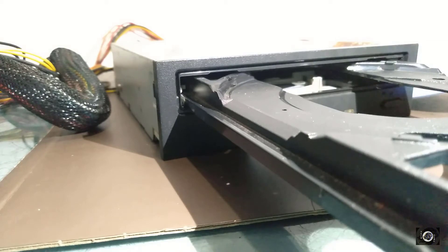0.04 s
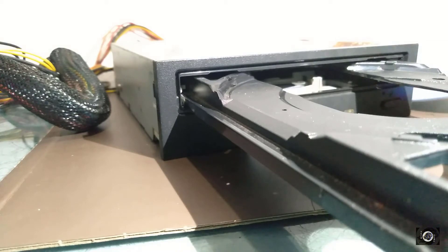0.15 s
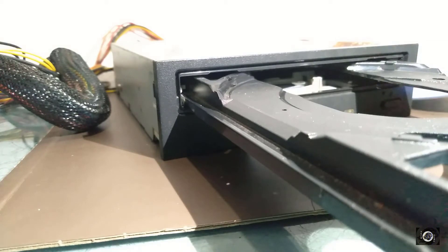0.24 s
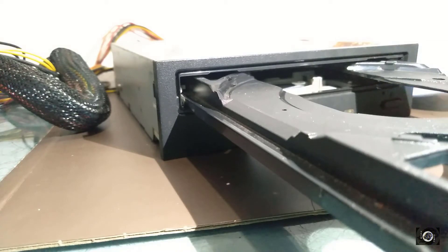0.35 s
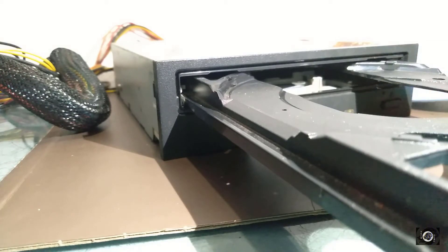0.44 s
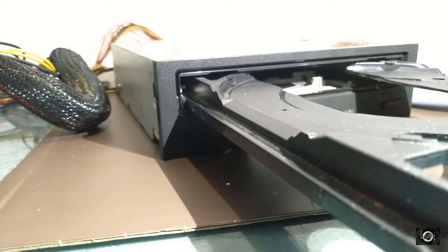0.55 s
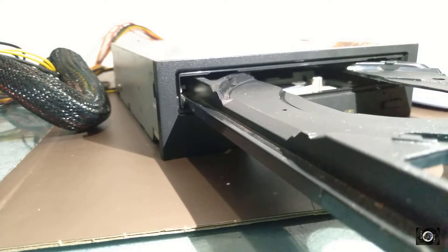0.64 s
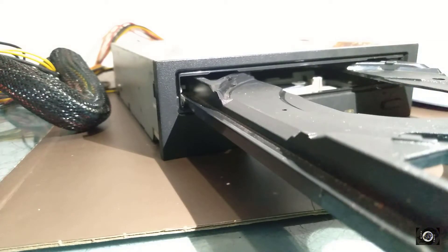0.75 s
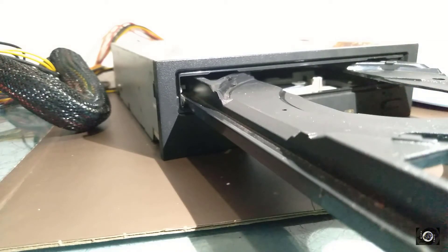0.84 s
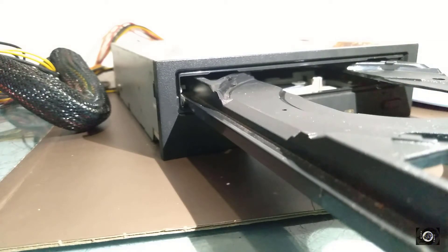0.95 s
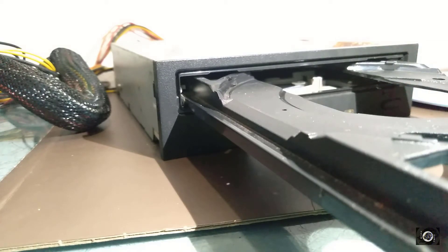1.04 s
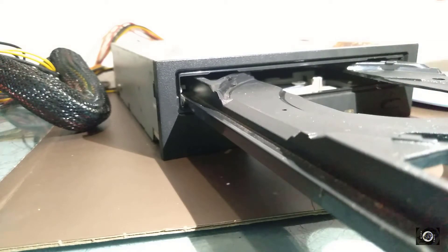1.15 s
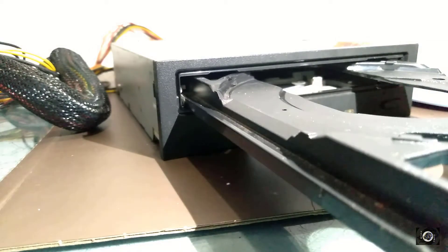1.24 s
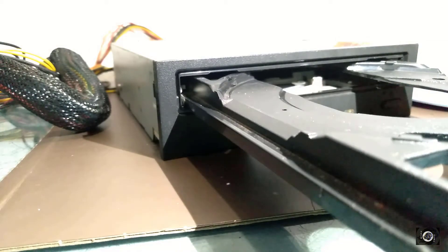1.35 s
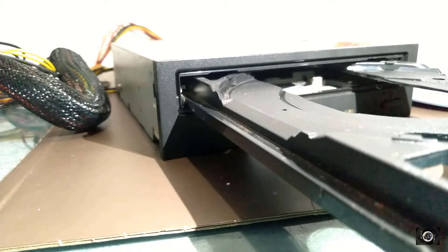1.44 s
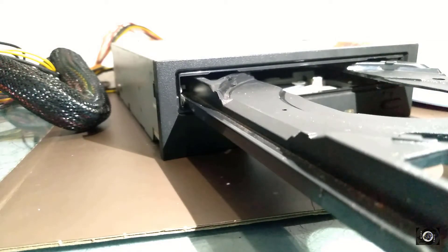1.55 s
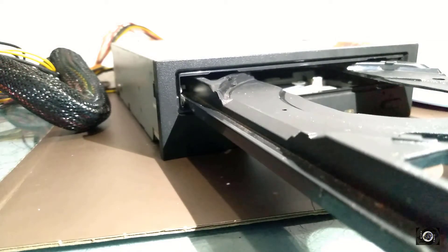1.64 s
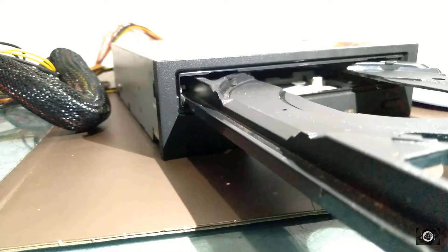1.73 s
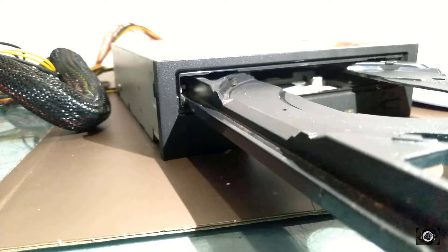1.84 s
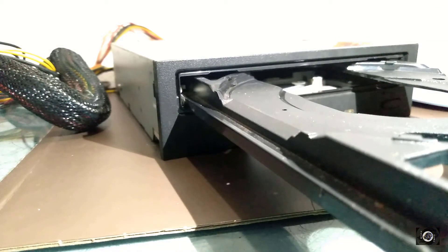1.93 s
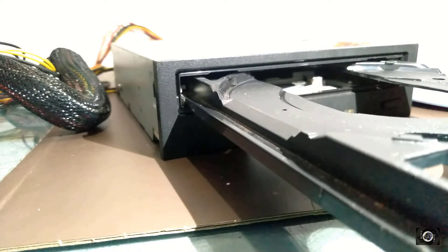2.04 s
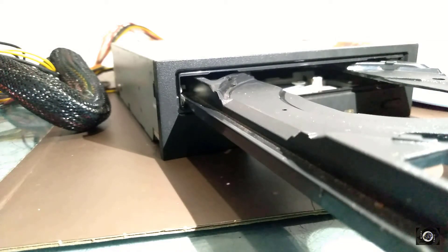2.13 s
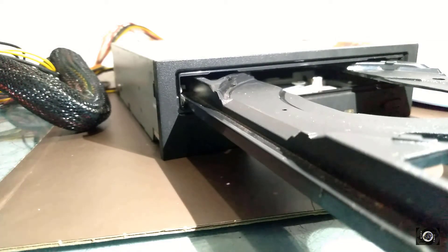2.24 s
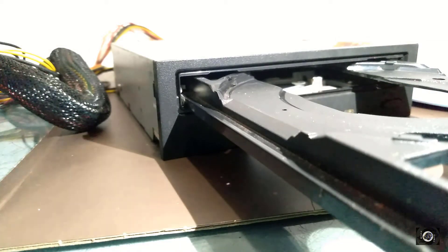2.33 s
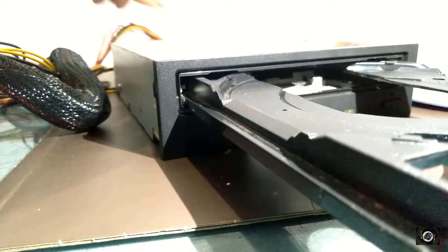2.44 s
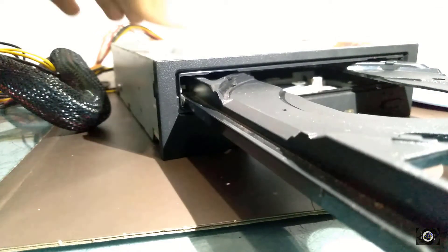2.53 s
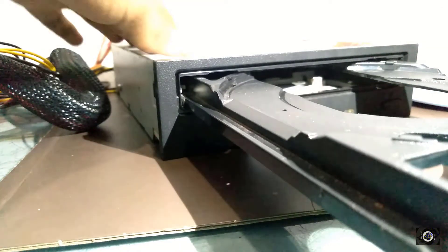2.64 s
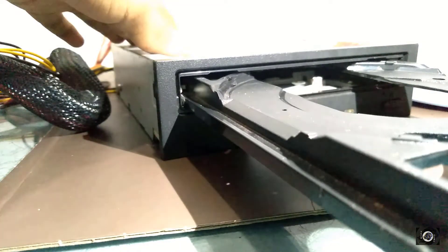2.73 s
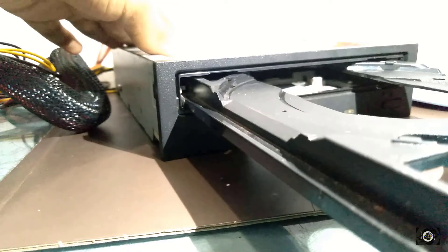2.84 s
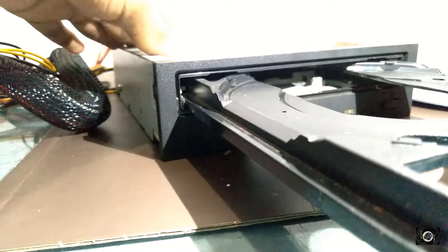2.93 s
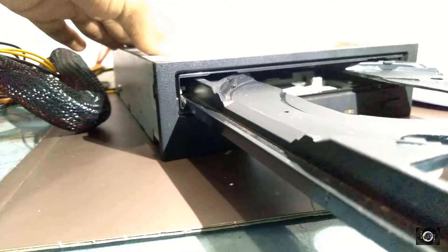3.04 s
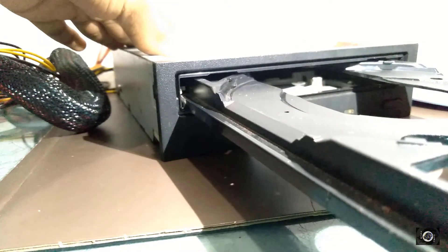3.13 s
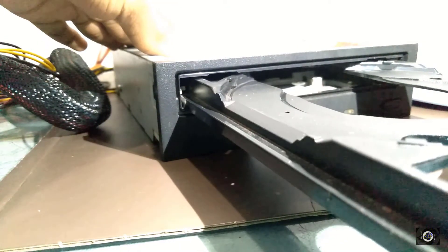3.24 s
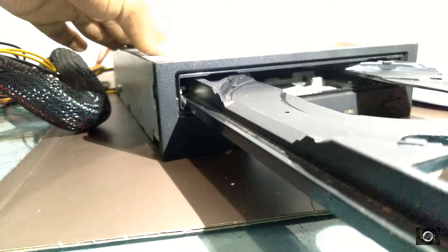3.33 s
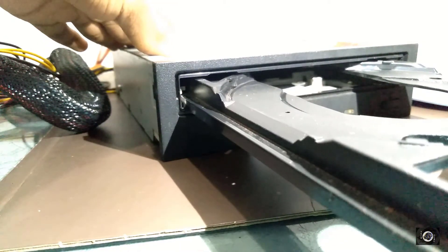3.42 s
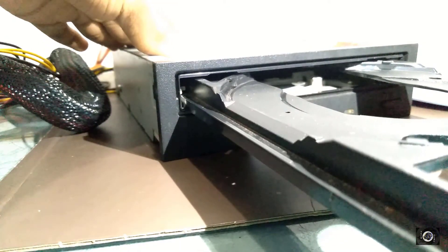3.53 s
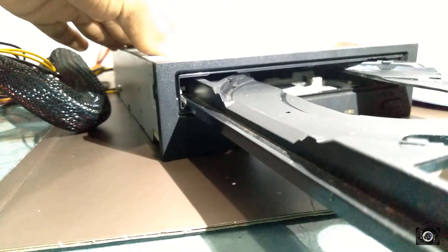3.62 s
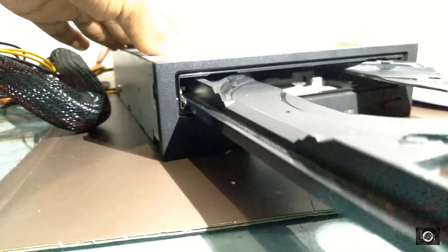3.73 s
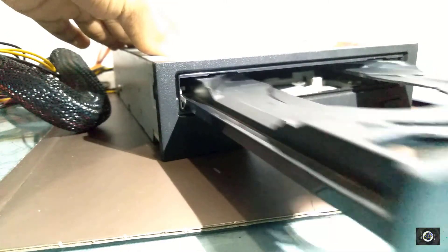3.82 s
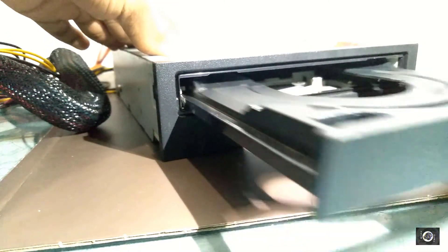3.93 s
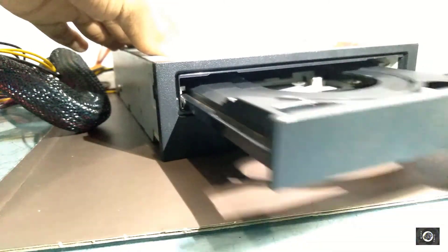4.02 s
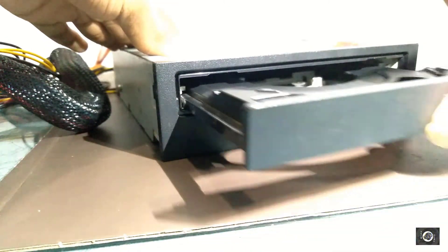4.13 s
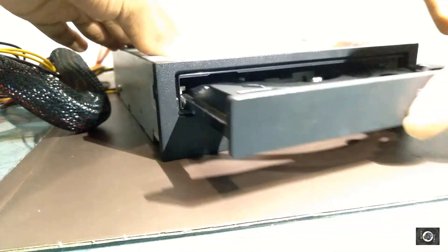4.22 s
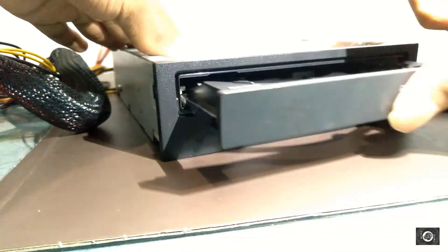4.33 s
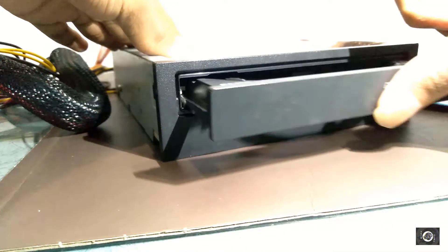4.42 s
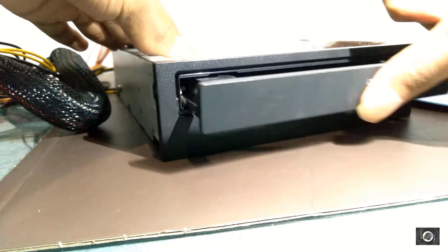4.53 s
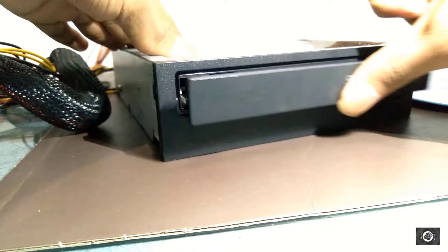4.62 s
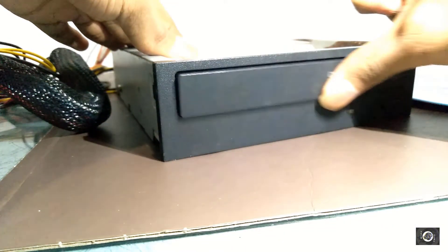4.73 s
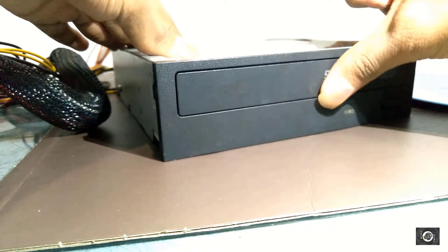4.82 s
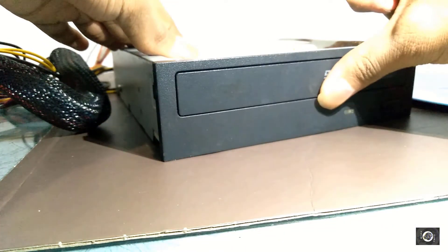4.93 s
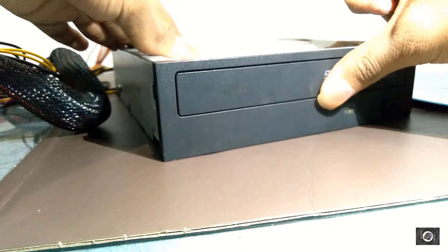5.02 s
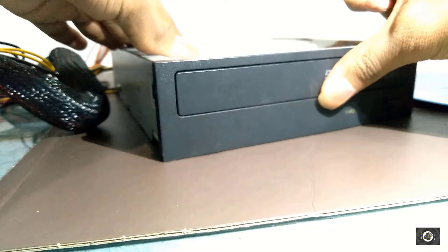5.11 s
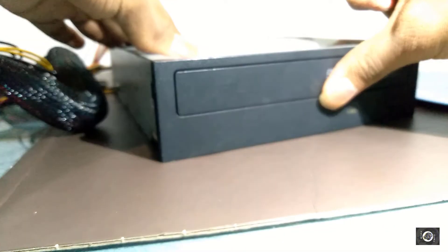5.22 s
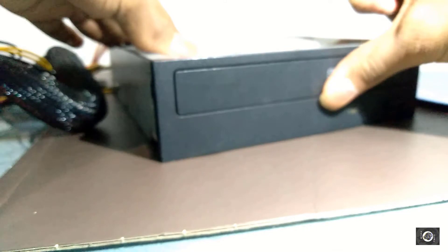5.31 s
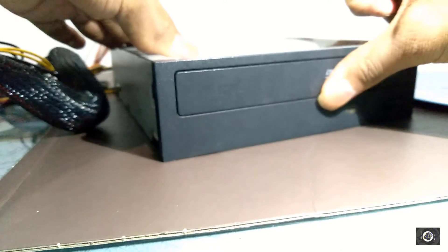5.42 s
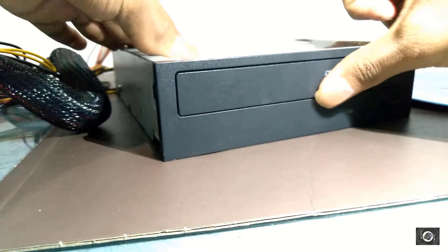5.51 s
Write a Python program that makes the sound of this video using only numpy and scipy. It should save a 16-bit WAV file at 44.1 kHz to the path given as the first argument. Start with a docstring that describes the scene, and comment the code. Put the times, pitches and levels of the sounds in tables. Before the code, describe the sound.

Close-up handling of a drive tray: sharp clicks, a rattling cluster, hissy scraping, then the rack whirs in and clacks closed.

```python
"""The open plastic tray of a disc drive is pushed shut on a table, close to the microphone: the rack
spins the gears into a hum and the runners rub as filtered friction noise. Before that the tray clicks,
rattles, scrapes and creaks: impulsive chatter and noise excite its resonances. The mechanism clacks
home, soft thumps travel through the table, and one last small click rings the front panel.
Low room noise and a thin whine lie beneath."""
import sys
import numpy as np
from scipy import signal
from scipy.fft import rfft, irfft
from scipy.io import wavfile
from scipy.ndimage import uniform_filter1d

SR = 44100
rng = np.random.default_rng(int(sys.argv[2]) if len(sys.argv) > 2 else 0)


def store_pcm(level_fs):
    """Save levels as 16-bit WAV."""
    pcm = np.round(np.clip(level_fs, -1, 1) * 32767).astype(np.int16)
    wavfile.write(sys.argv[1], SR, np.atleast_2d(pcm).T)


N = 245328
TIME = np.arange(N) / SR  # s
GRID = np.fft.rfftfreq(4096, 1 / SR)  # frequencies of every colour curve, Hz
PUSH_S, HOME_S = 3.79, 4.845  # the tray starts to move, and arrives
# low boom of the table and rumble of the moving tray: hz, level_db
RUMBLE_COLOUR = [(30, -26), (55, -9.5), (80, -2), (130, 1.5), (240, 2), (330, -6), (420, -19.5),
                 (700, -38.5)]


def amp(db):
    """Level in decibels to amplitude ratio."""
    return 10 ** (np.asarray(db) / 20)


def evened(x):
    """Normalization to an rms of 1."""
    return x / np.sqrt(np.mean(x ** 2) + 1e-20)


def shape(points):
    """Spectral envelope: points in dB joined on a log-frequency axis."""
    hz, db = np.transpose(points)
    return np.interp(np.log(GRID + 1), np.log(hz), db)


def peaks(modes):
    """Resonance curves: each mode is a bump, or a hollow, in dB around its frequency."""
    return sum(db / (1 + (2 * (GRID - hz) / width) ** 2) for hz, width, db in modes)


def ripple(count=45):
    """Modal density: a contact point favours some close modes, a random curve of rms 1 over frequency."""
    waves = rng.standard_normal(2 * count) + 1j * rng.standard_normal(2 * count)
    return evened(irfft(np.r_[0, waves], len(GRID)))


def colour(x, db):
    """Minimum-phase filter of unit energy: resonances ring after the blow, never before."""
    log_gain = np.log(amp(np.r_[db, db[-2:0:-1]]))
    spectrum = np.exp(np.conj(signal.hilbert(log_gain)))
    response = np.fft.ifft(spectrum).real
    return signal.oaconvolve(x, response / np.linalg.norm(response))[:len(x)]


def wander(rate_hz):
    """Low-passed noise: a smooth random motion of rms 1."""
    low_pass = 1 + (np.fft.rfftfreq(N, 1 / SR) / rate_hz) ** 4
    return evened(irfft(rfft(rng.standard_normal(N)) / low_pass, N))


def fuzzy_tone(hz, width_hz):
    """Quadrature modulation: two slow noises turn a carrier into a narrow noise band that follows hz."""
    turn = 2 * np.pi * np.cumsum(hz * np.ones(N)) / SR
    return evened(wander(width_hz / 2) * np.cos(turn) + wander(width_hz / 2) * np.sin(turn))


def friction(grain, flutter):
    """Dry friction: countless micro-slips of uneven size, coming in faint clumps."""
    return evened(rng.standard_normal(N) * (1 + grain * wander(900)) * (1 + flutter * wander(49)))


def drift(x, patch_db, size=(14, 4)):
    """Moving contact: different resonances come and go, as smoothed random gains over time and frequency."""
    z = signal.stft(x, nperseg=1024, noverlap=768)[2]
    patches = uniform_filter1d(rng.standard_normal(z.shape), size[0], 1)  # along time
    patches = evened(uniform_filter1d(patches, size[1], 0))  # along frequency
    return evened(signal.istft(z * amp(patch_db * patches), nperseg=1024, noverlap=768)[1][:N])


def cavity(x, open_delay=0.0018, shut_delay=0.00095, echo=0.087,
           long_open_delay=0.0037, long_shut_delay=.0032, long_echo=0.13):
    """Comb filtering: two case reflections shorten as the tray goes in, so hollows drift (delays in s)."""
    travel = [PUSH_S, HOME_S]
    near = np.interp(TIME - np.interp(TIME, travel, [open_delay, shut_delay]), TIME, x)
    far = np.interp(TIME - np.interp(TIME, travel, [long_open_delay, long_shut_delay]), TIME, x)
    return evened(x - echo * near + long_echo * far)


def add(mix, s, sound):
    """Superposition: adds a sound to the mix from time s, in place."""
    part = mix[round(s * SR):][:len(sound)]
    part += sound[:len(part)]


def next_drop(s):
    """Truncated decay: the time left until a sound begun at s falls away, and how far it falls."""
    # a lingering sound falls away abruptly: start_s, drop_db
    falls = [(0.382, -7), (0.887, -14), (1.906, -12.5), (3.092, -13), (3.491, -9.5), (4.989, -13.5)]
    return next(((at - s, db) for at, db in falls if at > s), (1, 0))


def background():
    """Stationary noise: a low room floor and a thin electronic whine of narrow noise bands."""
    # room noise: hz, level_db
    floor_colour = [(25, -20), (45, -11.5), (80, 2), (130, -3), (200, -18.5), (450, -17.5), (1000, -20),
                    (2500, -26.5), (5000, -29), (8500, -26.5), (13000, -32.5)]
    # thin electronic whine: hz, width_hz, level_db
    whine_bands = [(14100, 12, -69.5), (15150, 110, -67.5)]
    floor_db = -67.5
    whine = sum(amp(db) * fuzzy_tone(hz, width) for hz, width, db in whine_bands)
    return amp(floor_db) * colour(rng.standard_normal(N), shape(floor_colour)) + whine


def creaks(width_hz=83, width_share=0.081):
    """Stick-slip: the plastic moans under the fingers on gliding resonances; high ones are scratchier."""
    # creaks: loudest_s, pitch_hz, glide_hz_per_s, level_db, length_s
    moans = [(0.261, 5260, 2, -54, .025), (0.314, 600, 1, -42, 0.012), (0.534, 643, -42, -58.5, 0.14),
             (1.485, 433, -85, -61.5, 0.063), (1.685, 325, 499, -36, 0.024), (1.695, 2395, -3, -45, 0.03),
             (1.7, 854, 596.5, -48, 0.034), (1.851, 432.6, -550, -46.5, 0.11),
             (2.721, 3450, -0.5, -59, .03), (2.707, 3980, 1.5, -63, 0.028), (3.667, 970, -900, -68, 0.029)]
    out = np.zeros(N)
    for s, hz, glide, db, length in moans:
        swell = np.exp(-((TIME - s) / length) ** 2)
        tone = fuzzy_tone(hz + glide * (TIME - s), width_hz + width_share * hz)
        out += amp(db) * swell * tone
    return out


def scrapes(from_db=-31.5, sag_db_per_s=12.5, release_db_per_s=230):
    """Sliding friction: a light touch on the plastic gives a high hiss that swells, holds and fades."""
    # touches: start_s, rise_s, hold_s, level_db, top_treble_db
    touches = [(0.887, 0.074, 0.064, -40.5, 6), (1.181, 0.017, 0.0076, -60, 1),
               (1.627, 0.05, 0.38, -25.5, -0.5)]
    # colour of the scraped plastic: hz, level_db
    scraped_colour = [(500, -18.5), (2500, -35.5), (4500, -41.5), (6300, -31), (7300, -2), (8000, 2),
                      (9000, -4.5), (9800, -7.5), (11000, -7.5), (13300, -15.5), (14500, -3.5),
                      (15700, -2.5)]
    # hollows and a resonance in it: hz, width_hz, level_db
    scraped_modes = [(1170, 250, -9.5), (9790, 320, -7), (13200, 990, 4.5)]
    out, t = np.zeros(N), np.arange(SR) / SR
    slips = drift(friction(grain=.15, flutter=.07), 2.8)
    top = 1 - 1 / (1 + (GRID / 12500) ** 12)
    for s, rise, hold, db, top_db in touches:
        drop_s, drop_db = next_drop(s)
        swell_db = from_db * np.maximum(1 - t / rise, 0)
        fade_db = sag_db_per_s * t + release_db_per_s * np.maximum(t - rise - hold, 0)
        touch = uniform_filter1d(amp(db + swell_db - fade_db + drop_db * (t > drop_s)), size=150)
        tone = shape(scraped_colour) + peaks(scraped_modes) + top_db * top
        add(out, s, touch * colour(slips[round(s * SR):][:SR], tone))
    return out


def thumps(table_hz=95, table_decay=0.05, table_share=0.1, boom_decay=0.048, snap_db=-31):
    """Impulse response of the table: a soft push with a faint snap, a damped swing back and a brief boom."""
    # thumps carried by the table: start_s, push_level_db, push_length_s, boom_db
    pushes = [(0.659, -17, 0.00099, -16.5), (1.233, -38.5, 0.0012, -42), (2.046, -32, 0.0029, -17.5),
              (2.058, -21, 0.002, -31), (2.097, -33, .001, -33), (2.116, -24, 0.0017, -29.5),
              (2.129, -23, 0.0019, -33), (2.1568, -21.5, 0.0016, -34.5), (3.027, -26, 0.00064, -4.5),
              (3.497, -14, 0.0014, -21.5), (3.806, -10.5, 0.00083, -10), (4.856, -7.5, 0.0011, -21.5),
              (5.027, -41.5, 0.0025, -24.5), (5.551, -30.5, .001, -14)]
    out, t = np.zeros(N), np.arange(SR // 2) / SR
    for s, db, length, boom_db in pushes:
        u = t / length
        push = u ** 2 * np.exp(2 * (1 - u))
        snap = amp(snap_db) * rng.standard_normal(len(t)) * push
        swing = np.sin(2 * np.pi * table_hz * t) * np.exp(-t / table_decay)
        boom = colour(rng.standard_normal(len(t)), shape(RUMBLE_COLOUR)) * np.exp(-t / boom_decay)
        add(out, s, amp(db) * (push + snap - table_share * swing + amp(boom_db) * boom))
    return signal.lfilter(*signal.butter(1, 45, "high", fs=SR), out)


def blow(s, decay, room_db, ring_db=-7, ring_decay=0.0079, room_t60=0.35, tail_ripple_db=2.0):
    """Impulsive noise: chatter, a short ring, and a grainy room tail cut down by any next drop."""
    # what the chassis keeps ringing with: hz, width_hz, level_db
    chassis_modes = [(1726, 98, 9.5), (3250, 140, 8.5), (4000, 110, 7.5), (4970, 70, 5.5), (7640, 150, 5.5)]
    t = np.arange(SR // 2) / SR
    hold, drop_db = next_drop(s)
    chatter = rng.choice([-1., 1.], len(t)) * np.exp(-t / decay)
    chatter *= 1 - np.exp(-(t + 1 / SR) * 9 / decay)  # long scuffs also start softly
    ring = rng.standard_normal(len(t)) * np.exp(-t / ring_decay)
    tail_tone = peaks(chassis_modes) + tail_ripple_db * ripple(count=90)
    room = colour(rng.standard_normal(len(t)), tail_tone)
    room *= np.exp(-np.log(1000) * t / room_t60) * (1 - np.exp(-t / 0.0038))
    room *= amp(drop_db * (t > hold))
    after = amp(ring_db) * ring / np.linalg.norm(ring) + amp(room_db) * room / np.linalg.norm(room)
    return chatter + np.linalg.norm(chatter) * after  # levels relative to the chatter


def rail_ring(decay):
    """Modal ringing: damped sines of a guide rail, prolonged by the chatter that keeps exciting them."""
    # guide rail modes: pitch_hz, level_db, t60_s (before the chatter prolongs it)
    rail_modes = [(1290, -24.5, 0.025), (3510, -18.5, 0.013), (3469, -10, 0.026), (3930, -15, 0.021)]
    t = np.arange(SR // 2) / SR
    return sum(amp(db) * np.sin(2 * np.pi * hz * t) * np.exp(-t / (decay + t60 / np.log(1000)))
               for hz, db, t60 in rail_modes)


def knocks():
    """Selective modal excitation: the tray strikes its guides, one knock after a faint dull noise burst."""
    # knocks, and a faint dull burst of noise just before the one at 0.30 s:
    # start_s, level_db, chatter_decay_s, bass_db, treble_db, rail_ring_db, room_db
    bursts = [(0.222, -46, 0.0076, -26, -18.5, -6, 4), (0.29, -40.5, 0.0091, -0.5, -31.5, 0.5, -9),
              (0.3017, -3, 0.0014, -22, -5, -12.5, -6), (0.336, -26, 0.0011, -15, -24, 0.5, 9),
              (0.606, -50, 0.049, -11.5, -11.5, -6, -1.5), (0.632, -34, 0.0047, 0, -5, -8, 9),
              (0.6447, -13, 0.0019, 12, -19, -18, 5), (.650, -7.5, 0.008, 10.5, 3, -21, 1),
              (.655, -8.5, 0.0036, 11.5, 4.5, -15, -5.5), (0.6593, 0.5, 0.0057, 3, 10, -22.5, -10.5),
              (0.6741, -8.5, 0.0061, 4, 0, -21.5, -13), (0.681, -4.5, 0.0038, 0, 7, -22.5, -12),
              (0.701, -3.5, 0.0015, 2.5, 2, -22, -8.5), (.718, -3.5, 0.0036, 6, 7.5, -19, -29.5),
              (.731, -12.5, .0055, 15, 6.5, -12, 2), (1.233, -44, 0.00071, 0, 4, -24, -20),
              (1.644, -42.5, 0.014, -12, -2.5, -17, -11), (1.662, -23, 0.014, -7.5, 4.5, -19.5, -0.5),
              (2.545, -60, 0.0087, -10, 0, -15, -3.5), (2.694, -48, 0.051, -35.5, 10, -5.5, -9.5),
              (3.003, -31.5, .0041, -7.5, -11.5, 6, -11), (3.012, -4.5, 0.0012, 6, -8.5, 1.5, -5.5),
              (3.173, -59, .02, -8, -19, 3.5, -8), (3.476, -21.5, 0.0014, 2, -17, 11.5, -23.5),
              (3.479, -16, 0.0019, 4, 3, -4.5, -10.5), (3.776, -29, 0.0054, -3, -2.5, 7.5, -9.5),
              (3.781, -1.5, .0056, -3, 6.5, 0.5, -8.5), (3.797, -7, 0.0036, 9, -1, 3.5, -7)]
    # broad colour of the tray: hz, level_db
    tray_colour = [(40, -12), (130, -2.5), (320, 2), (900, -4.5), (1500, -4), (2600, 0), (4200, -1),
                   (5200, -2), (7000, -3.5), (9500, -6), (12000, -8.5), (15500, -8)]
    # its resonances and hollows: hz, width_hz, level_db
    tray_modes = [(1010, 150, -6.5), (2240, 67, 0.5), (3200, 690, -1), (4800, 220, -1), (6170, 58, 6.5),
                  (6800, 180, 5), (7700, 1200, 1), (8000, 1400, 7), (8550, 2300, 6), (10340, 370, 7),
                  (15300, 250, 5)]
    out = np.zeros(N)
    bass, treble = 1 / (1 + (GRID / 700) ** 2), 1 - 1 / (1 + (GRID / 10000) ** 6)
    for s, db, decay, bass_db, treble_db, rail_db, room_db in bursts:
        tone = shape(tray_colour) + peaks(tray_modes) + bass_db * bass + treble_db * treble
        tone += np.interp(db, [-40, -25], [7, 2.5]) * ripple()  # faint ones stir only a few modes
        body = colour(blow(s, decay, room_db), tone)
        add(out, s, amp(db) * (body + amp(rail_db) * rail_ring(decay)))
    return out


def clacks():
    """Enclosed impact: gears and latch strike inside the case, which rings lower than the tray."""
    # clacks: start_s, level_db, chatter_decay_s, bass_db, treble_db, room_db
    strikes = [(3.9993, -7, 0.0023, 3, 16, -14), (4.009, -9.5, 0.0052, 5, 10, -17),
               (4.030, -26, 0.0051, 15, 6, 9.5), (4.311, -18, 0.0044, -4, 0, -10),
               (4.7308, -4.5, 0.0033, -8, 6, -13.5), (4.754, -5.5, 0.0042, -8, 2.5, -11.5),
               (4.777, -18.5, 0.016, 2.5, -1, -6.5), (4.7998, -2, .0035, 3.5, 10.5, -11.5),
               (4.8089, -5.5, 0.0048, -4.5, 0.5, -13), (4.8505, -3, 0.0025, 11.5, -5, -14.5),
               (5.487, -22.5, 0.0028, 2.5, -10, -10), (5.544, -37, 0.0075, 19, -23, -8)]
    # broad colour of a clack: hz, level_db
    case_colour = [(40, -19), (150, 2), (550, 6.5), (950, 5), (1300, 8), (2200, -2), (2800, -7.5),
                   (4500, -9), (6500, -11.5), (8500, -13), (12000, -25.5), (15500, -30)]
    # its resonances and hollows: hz, width_hz, level_db
    case_modes = [(287, 39, 6.5), (408.6, 10, 9.5), (649.5, 52, 9), (993, 440, -1.5), (1310, 86, 6),
                  (1730, 57, 5.5), (2260, 350, 11), (3100, 1340, 7.5), (4130, 360, 2)]
    out = np.zeros(N)
    bass, treble = 1 / (1 + (GRID / 700) ** 2), 1 - 1 / (1 + (GRID / 4200) ** 6)
    for s, db, decay, bass_db, treble_db, room_db in strikes:
        tone = shape(case_colour) + peaks(case_modes) + bass_db * bass + treble_db * treble
        tone += 2.2 * ripple()
        add(out, s, amp(db) * colour(blow(s, decay, room_db, ring_db=-18.5), tone))
    return out


def snaps():
    """Modal synthesis: the front panel's modes are struck under the thumb, and again as it rebounds."""
    # strikes of the panel: start_s, level_db
    strikes = [(5.4884, -19.5), (5.492, -33)]
    # panel modes: pitch_hz, level_db, t60_s
    panel_modes = [(298, -19, 0.074), (460, -18.5, 0.066), (712, -16.5, 0.0063), (1720, -8, 0.036),
                   (1767, 0.5, 0.02), (2035, -9, 0.076), (2710, -11.5, 0.026), (3940, -25.5, 0.049),
                   (6000, -17, 0.029)]
    out, t = np.zeros(N), np.arange(SR // 8) / SR
    ring = sum(amp(db - 60 * t / t60) * np.sin(2 * np.pi * hz * t) for hz, db, t60 in panel_modes)
    for s, db in strikes:
        add(out, s, amp(db) * ring)
    return out


def stroke(tooth_hz, db, speed_power, sag_db_per_s, coast_s, release_db_per_s, rise_s=0.01, usual_hz=200):
    """Power law of speed: a gain that follows the tray, sags as it goes in, and dies once it is home."""
    hold, drop_db = next_drop(PUSH_S)
    t = np.maximum(TIME - PUSH_S, 0)
    fade_db = sag_db_per_s * t + release_db_per_s * np.maximum(TIME - HOME_S - coast_s, 0)
    level = amp(db - fade_db + drop_db * (t > hold))
    return np.minimum(t / rise_s, 1) * (tooth_hz / usual_hz) ** speed_power * level


def slide(jitter=0.02, shove_db=3.5, firm_shove_hz_per_s=400):
    """Gear meshing and friction: teeth hum at their passing rate and modulate the rub of the runners."""
    # the hand shoves twice; speed as the rate of gear teeth passing: time_s, tooth_hz
    speed = [(3.8, 115), (3.92, 206.4), (4.05, 253.4), (4.2, 197), (4.41, 117.6), (4.49, 130),
             (4.64, 195.8), (4.8, 184.2), (4.91, 128.6), (4.99, 116)]
    # colour of the rubbing runners: hz, level_db
    rub_colour = [(250, -31.5), (450, -6), (700, -2.5), (980, -8), (1300, -3), (1900, -2.5), (2700, -3.5),
                  (4300, -6), (5500, -12.5), (7500, -25.5)]
    # its resonances and hollows: hz, width_hz, level_db
    rub_modes = [(413.5, 19, 5.5), (493, 41, 11), (610, 88, 7), (977, 96, -6), (2062, 200, -11.5),
                 (2840, 160, -6), (1229, 75, 8.5), (1500, 39, -4), (2155, 75, 9.5), (3160, 30, 6.5),
                 (3390, 57, -5), (4120, 260, 1.5), (4700, 79, -1)]
    # hollows that open as the tray fills the case: hz, width_hz, level_db
    shut_hollows = [(961, 92, -11), (2950, 1200, -6), (1930, 220, -3.5)]
    # colour of the high hiss: hz, level_db
    hiss_colour = [(2940, -33), (5000, -2.5), (5760, -2.5), (6660, -4.5), (7750, -4), (8380, -2),
                   (9980, -5), (10900, -13), (11900, -6.5), (13600, -14), (15200, -6.5), (16000, -9.5)]
    # its resonances: hz, width_hz, level_db
    hiss_modes = [(6550, 120, 1), (7620, 180, 7), (9470, 150, 3.5), (10500, 160, 3.5), (12610, 200, 2.5),
                  (14400, 220, 8)]

    tooth_hz = np.interp(TIME, *np.transpose(speed))
    # the hum is louder while the hand speeds the gears up, softer as they slow
    acceleration = uniform_filter1d(np.gradient(tooth_hz) * SR, size=2000)
    effort_db = shove_db * np.tanh(acceleration / firm_shove_hz_per_s)
    turn = 2 * np.pi * np.cumsum(tooth_hz * (1 + jitter * wander(65))) / SR
    harmonics = np.cos(turn) + 0.18 * np.cos(2 * turn) + 0.2 * np.cos(3 * turn)
    hum = evened(harmonics * amp(2.1 * wander(22) + effort_db))

    rumble = colour(rng.standard_normal(N), shape(RUMBLE_COLOUR))
    tooth_pressure = 1 + .15 * np.cos(turn)
    slips = tooth_pressure * drift(friction(grain=.28, flutter=.14), 3.2)
    inside = np.interp(TIME, [PUSH_S, HOME_S], [0, 1]) ** .5
    rub_tone, hollows = shape(rub_colour) + peaks(rub_modes), peaks(shut_hollows)
    open_rub = colour(slips, rub_tone - hollows / 2)
    shut_rub = colour(slips, rub_tone + hollows)
    rub = cavity((1 - inside) * open_rub + inside * shut_rub)
    hiss = cavity(colour(slips, shape(hiss_colour) + peaks(hiss_modes)), echo=.12)
    return (hum * stroke(tooth_hz, db=-30.5, speed_power=.4, sag_db_per_s=0.5,
                         coast_s=0.088, release_db_per_s=201.5)
            + rumble * stroke(tooth_hz, db=-28, speed_power=.15, sag_db_per_s=2.0,
                              coast_s=0.057, release_db_per_s=125.5)
            + rub * stroke(tooth_hz, db=-27.0, speed_power=1.6, sag_db_per_s=2.5,
                           coast_s=0, release_db_per_s=201)
            + hiss * stroke(tooth_hz, db=-25, speed_power=0.82, sag_db_per_s=3.0,
                            coast_s=-0.0024, release_db_per_s=501.5))


def scene():
    """Superposition of all sources, the same in both channels."""
    mono = background() + creaks() + scrapes() + thumps() + knocks() + clacks() + snaps() + slide()
    return np.array([mono, mono])


def record(dry, mic_low_hz=41.7, edge_hz=16000):
    """Transducer limits: the microphone loses the deepest bass, clips at full scale, then is low-passed."""
    without_bass = signal.lfilter(*signal.butter(2, mic_low_hz, "high", fs=SR), dry)
    clipped = np.clip(without_bass, -1, 1)
    low_pass = signal.firwin(511, edge_hz, window=("kaiser", 9), fs=SR)
    return signal.oaconvolve(clipped, low_pass[None], "same")


dry = scene()
out = record(dry)
store_pcm(out)
```